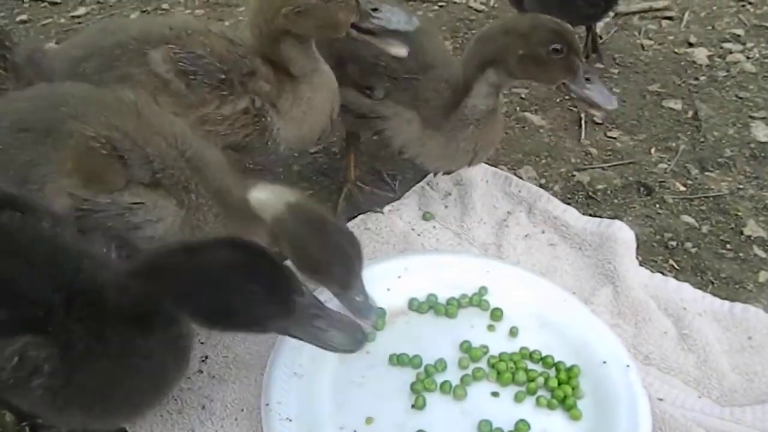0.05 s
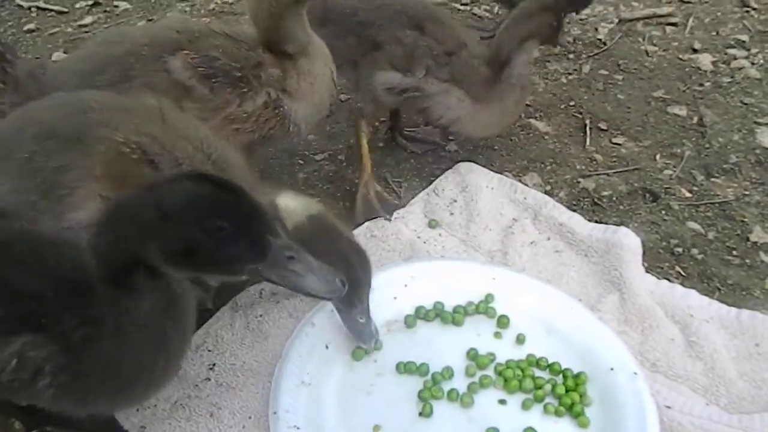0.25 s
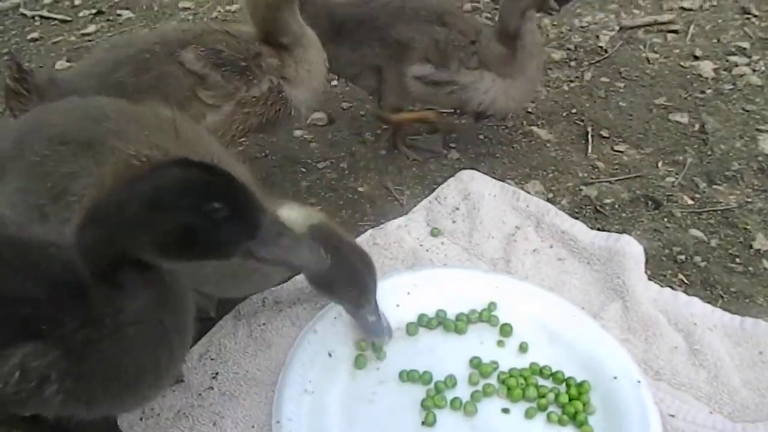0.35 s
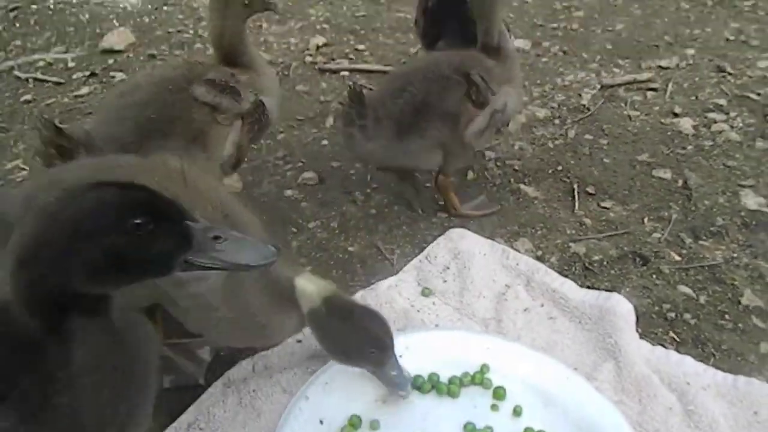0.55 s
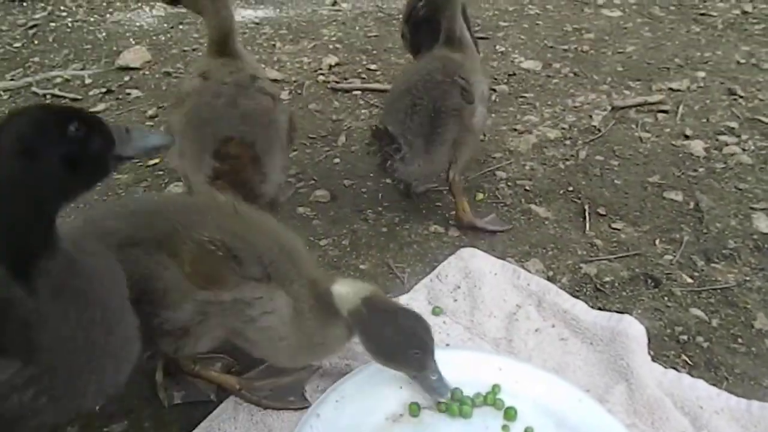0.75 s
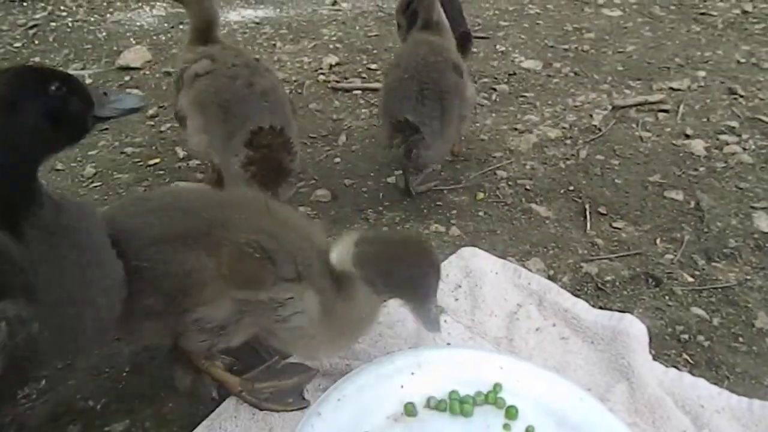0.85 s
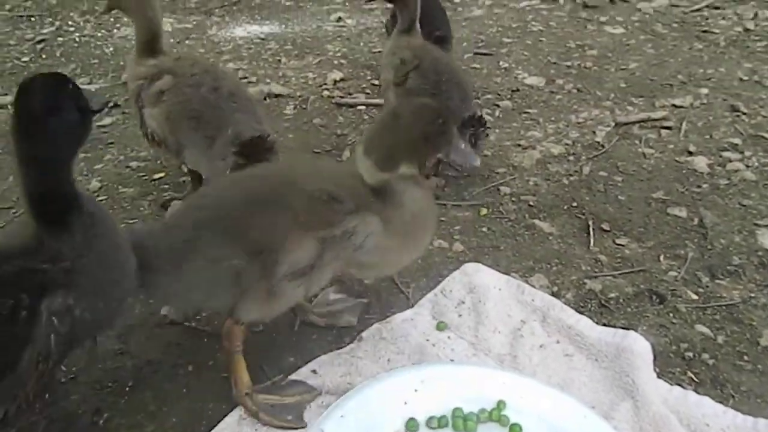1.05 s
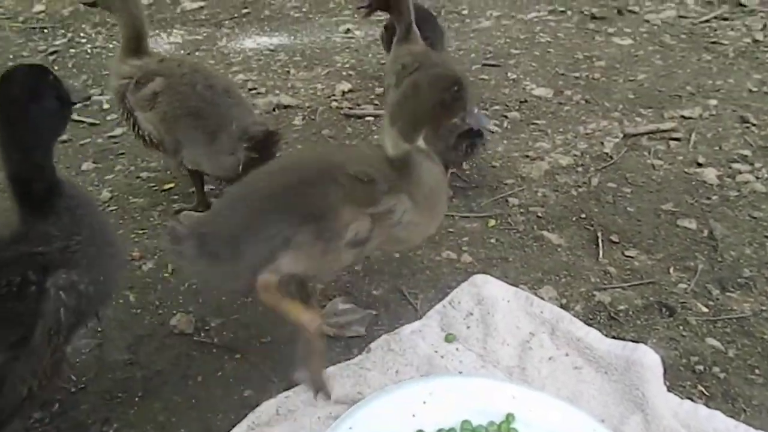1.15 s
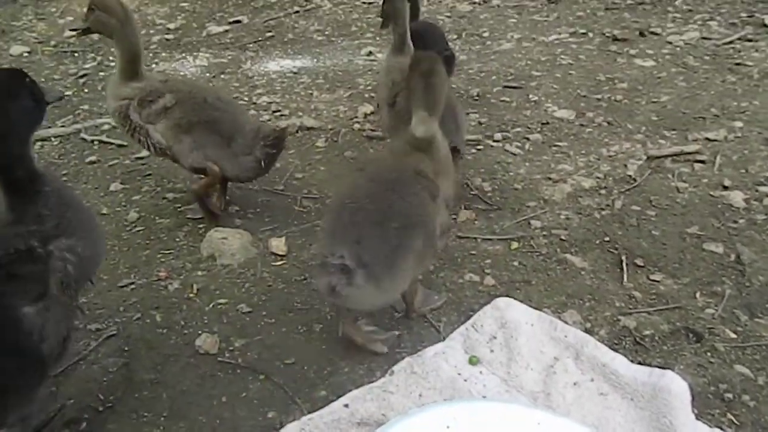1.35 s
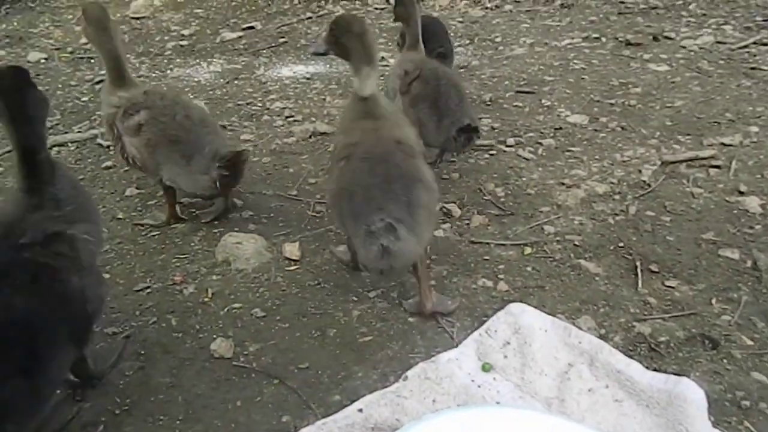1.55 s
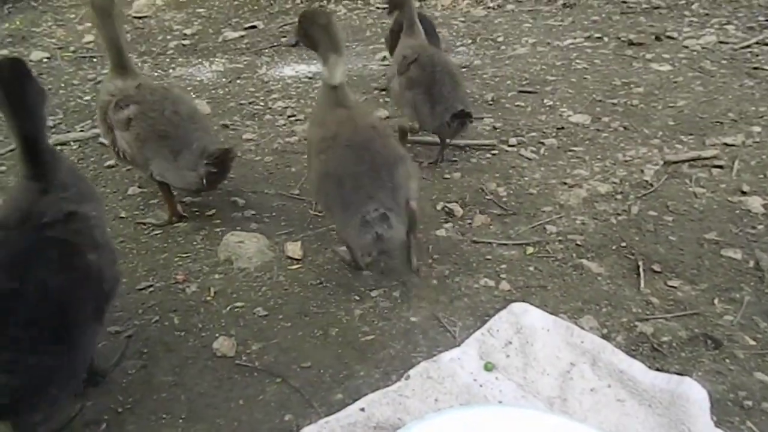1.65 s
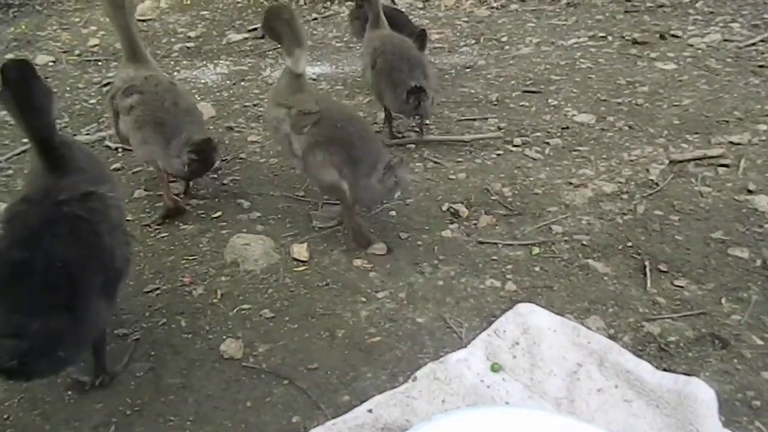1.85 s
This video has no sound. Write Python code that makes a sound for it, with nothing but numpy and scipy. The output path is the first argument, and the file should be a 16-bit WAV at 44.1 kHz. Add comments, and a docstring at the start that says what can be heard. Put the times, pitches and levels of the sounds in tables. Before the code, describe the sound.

Duckling peeps, quick arched whistles, over light bill taps on a plastic plate outdoors

```python
"""Four arched duckling peeps over the pecking of bills on a plastic plate, soft steps on grit and a low hum.
Place: a cloth outdoors, birds and plate close to the stereo microphone, the hum far off.
Peeps are near-sine whistles with an octave, sidebands and breath; pecks are impulses into ringing plate modes.
The hum is shaped noise, a faint steady sine lies in it, and a short noise tail scatters the near sounds."""
import sys
import numpy as np
from scipy import signal
from scipy.fft import rfft, irfft
from scipy.io import wavfile
from scipy.ndimage import uniform_filter1d

SR = 44100
rng = np.random.default_rng(int(sys.argv[2]) if len(sys.argv) > 2 else 0)


def wrap_up_sound(samples):
    """Save the sound to the file named by the first command line argument, as 16-bit audio."""
    columns = np.atleast_2d(samples).T
    # keep every value between -1 and 1, then stretch to whole-number steps
    tamed = np.clip(columns, -1, 1)
    steps = np.round(tamed * 32767).astype(np.int16)
    wavfile.write(sys.argv[1], SR, steps)


N = 83790  # samples

# Distant hum, spectrum before levelling: (frequency [Hz], relative density [dB])
HUM_SPECTRUM = [(24, -41), (40, -14.5), (106, -2.5), (180, -12), (215, -13), (363, -13.5), (444, -18),
                (733, -22.5), (873, -21), (990, -18.5), (16000, -38)]
# Likeness of the hum in the two channels: (frequency [Hz], correlation [-1 to 1])
HUM_LIKENESS = [(60, 0.87), (240, 0.14), (950, 0.13), (3770, 0.13), (15000, -0.31)]
# Stereo balance of the hum: (frequency [Hz], left minus right [dB])
HUM_BALANCE = [(60, 0), (240, -2), (950, -1.5), (3770, -1.5), (15000, 0.5)]
# Modes of the plate before each spot bends them: (frequency [Hz], relative level [dB], 60 dB decay time [s])
PLATE_MODES = [(189.2, -1.5, 0.037), (313.2, -1, 0.018), (458, 0.5, 0.014), (615, 1, 0.014),
               (1045, -2.5, 0.022), (1718, 7.5, 0.0038), (2560, 7.5, 0.0025), (3150, 2, 0.0058),
               (3520, -5.5, 0.0045), (5160, -4.5, 0.0063), (6800, -13.5, 0.0052), (9280, -11, 0.0039),
               (11560, -14.5, 0.0043), (14000, -21, 0.0029)]
# Bill ticks: (time [s], drive of the high modes [dB], treble tilt [dB per octave])
BILL_TICKS = [(0.0794, -25, 3), (.0845, -43, -10), (0.096, -36, -8), (0.1048, -34, 2), (.106, -29, -3.5),
              (.1255, -38, 1), (.139, -46, 5), (0.178, -44, 12), (.197, -40, -6), (0.214, -34.5, -2),
              (.298, -37, 2.5), (.3355, -27, -17), (.361, -11, -11), (.4375, -14.5, -2.5),
              (.4436, -22, 1.5), (0.4466, -22, 1), (.5205, -35, 2), (.532, -25, -28), (.5338, -25, -5),
              (0.5351, -19.5, -11), (0.602, -35.5, -11), (0.9108, -43, 4), (0.9301, -35, 4),
              (1.042, -44.5, 7.5), (1.456, -45, 0), (1.507, -45.5, -12)]
# Soft knocks of bills and feet: (time [s], drive of the low modes [dB], pitch they answer around [Hz])
SOFT_KNOCKS = [(.061, -30, 330), (.07, -25, 515), (0.0996, -30, 190), (.124, -28, 487),
               (0.3346, -32.5, 398), (0.3592, -20, 252), (.361, -17.5, 1020), (.372, -31, 326),
               (.4365, -26, 356), (.519, -40.5, 387), (.537, -26.5, 286), (.9245, -27.5, 290),
               (0.9301, -26, 375), (0.9345, -35, 192), (0.9547, -40, 250), (1.372, -36.5, 350),
               (1.523, -39.5, 330), (1.775, -42.5, 480), (1.815, -37.5, 395)]
# Scrapes: (start [s], length [s], low-mode drive [dB], high-mode drive [dB], treble tilt [dB per octave])
PLATE_SCRAPES = [(0.056, 0.069, -33, -30.5, 2), (0.149, 0.091, -64, -37, 6.5),
                 (0.246, 0.023, -32.5, -34, 2.5), (0.343, 0.031, -31, -51, -18),
                 (0.408, 0.042, -38, -27.5, 2.5), (0.4349, 0.019, -30.5, -15, 5),
                 (0.507, 0.057, -38.5, -33, 5), (0.696, 0.053, -30.5, -24.5, -2),
                 (0, 0.067, -47.5, -46.5, 11.5), (0.583, 0.22, -47, -42.5, 3)]
# Stereo phase of the plate: (frequency [Hz], left ahead of right [rad])
PLATE_LEAD = [(2000, 0.12), (16000, 1.53)]
# Stereo balance of the plate: (frequency [Hz], left minus right [dB])
PLATE_BALANCE = [(60, 18), (240, -2), (950, -1.5), (3770, -4), (15000, 2)]
# Pitch and level through each peep, one curve per peep: (time [s], pitch [Hz], level [dB])
PEEP_CURVES = [
    [(.222, 1620, -50), (.23, 1800, -34), (.24, 2210, -21), (.25, 2500, -17.5), (.257, 2600, -20.5),
     (.2615, 2640, -35), (.265, 2645, -27), (.274, 2350, -29), (.284, 1940, -35), (.297, 1520, -54)],
    [(.336, 1830, -46), (.343, 2060, -28), (.352, 2285, -21.5), (.36, 2385, -20), (.37, 2445, -21),
     (.379, 2455, -19.5), (.388, 2290, -23), (.397, 1910, -35), (.406, 1650, -52)],
    [(.701, 1650, -48), (.708, 2110, -28), (.716, 2470, -19), (.722, 2745, -21), (.73, 2960, -27.5),
     (.737, 3060, -30.5), (.746, 2830, -26), (.753, 2470, -20.5), (.758, 2030, -33), (.764, 1600, -50)],
    [(1.566, 1600, -48), (1.5675, 1670, -34), (1.572, 1830, -36), (1.577, 1980, -30), (1.585, 2110, -33),
     (1.594, 2135, -34), (1.61, 1930, -30.5), (1.618, 1800, -39), (1.633, 1560, -58)],
]
# Colour of each peep, first two against its peak, sidebands on the tone's own scale:
# (octave [dB], breath [dB], sideband [dB], left minus right [dB])
PEEP_VOICES = [(-42, -27, -45, -5), (-33, -32, -45, -4.5), (-34, -24, -38, -4.5), (-30, -24, -9, -3.5)]
# Breath spectrum before levelling: (frequency [Hz], relative level [dB])
BREATH_SPECTRUM = [(100, -15), (700, -12.5), (1800, -8.5), (3200, -17), (5500, -15), (8000, -27),
                   (16000, -41)]

HUM_DB = -47  # rms over both channels, before the bass cut and band limit
WHINE_HZ, WHINE_DB = 1117, -67.5  # peak level before it wavers
YARD_T60, YARD_PEEP_DB, YARD_PLATE_DB = 0.098, -18, -7  # decay [s], sends into the scatter [dB]
SPOTS = 5  # places on the plate that share scrapes and grit
RASP_PER_S, GRIT_PER_S = 2800, 130  # blows per second over all spots
GRIT_DB = -62.5  # drive of the high modes
FOCUS_DB = 9.5  # fall of a mode one octave from the pitch of a knock
MUTE_DB = -99  # drive of modes left silent
WHISTLE_LEAD = 0.24  # left ahead of right [rad]
WARBLE = 1 / 4  # an uneven four-cycle beat of the membrane puts lines a quarter of the pitch apart
LOWER_DB, TENTH_DB = -4, -17  # lower line and octave of the upper line, against the upper line
LOW_CUT_HZ, EDGE_HZ = 51, 15850
SIDES = np.array([[.5], [-.5]])  # left and right halves of a stereo difference


def amp(db):
    """Amplitude factor of a level in dB."""
    return 10 ** (np.asarray(db) / 20)


def evened(x):
    """Scale a signal to an rms of one."""
    return x / np.sqrt(np.mean(x ** 2) + 1e-20)


def read(points, hz):
    """Read a curve at any frequency, straight between its points on a log axis."""
    f, value = np.transpose(points)
    return np.interp(np.log(hz + 1), np.log(f + 1), value)


def add(mix, s, sound):
    """Lay a sound into the mix at s seconds, cut off at the end of the mix."""
    part = mix[..., round(s * SR):][..., :sound.shape[-1]]
    part += sound[..., :part.shape[-1]]


def hum():
    """Distant outdoor wash: partly shared stereo noise, shaped by band, with drifting patches of level."""
    frames, hz = N // 256 + 5, np.fft.rfftfreq(1024, 1 / SR)
    a, b, c, d, patches = rng.standard_normal((frames, 513, 5)).T
    patches = uniform_filter1d(patches, 30, 0)  # over frequency
    patches = evened(uniform_filter1d(patches, 6, 1))  # over time
    same = np.clip(read(HUM_LIKENESS, hz), -1, 1)[:, None]
    left = a + 1j * b
    right = same * left + np.sqrt(1 - same ** 2) * (c + 1j * d)
    z = np.array([left, right])
    z *= amp(read(HUM_SPECTRUM, hz)[:, None] + 1.25 * patches)
    z *= amp(SIDES[:, :, None] * read(HUM_BALANCE, hz)[:, None])
    wash = signal.istft(z, nperseg=1024, noverlap=768)[1][:, :N]
    return amp(HUM_DB) * evened(wash)


def whine():
    """A faint sine of steady pitch that wavers a little in level."""
    waver = evened(uniform_filter1d(rng.standard_normal(N), size=4000))
    return amp(WHINE_DB + 2 * waver) * np.sin(2 * np.pi * WHINE_HZ * np.arange(N) / SR)


def yard(x):
    """Short scatter from the ground and the other birds: a decaying noise tail for each channel."""
    t = np.arange(round(.25 * SR)) / SR
    tail = rng.standard_normal((2, len(t))) * amp(-60 * t / YARD_T60) * (t > .002)
    return signal.fftconvolve(x, tail / np.linalg.norm(tail[0]), axes=1)[:, :N]


def blows(count, per_s):
    """Random clicks of either sign, a few of them large."""
    u, size, sign = rng.random((count, 3)).T
    return (u < per_s / SR) * amp(-3.5 * np.log(size + 1 / 100)) * np.sign(sign - .5)


def ring(hits, thud_db, click_db, tilt_db, knock_hz=None):
    """The plate's modes answer a train of blows; each spot that is hit bends their pitch and weight."""
    t, out = np.arange(2000) / SR, 0
    spot = rng.standard_normal((len(PLATE_MODES), 2))
    for (hz, db, t60), (bend, weight) in zip(PLATE_MODES, spot):
        click = click_db + tilt_db * np.log2(max(hz / 3200, 1))
        db = db + (thud_db if hz < 1350 else click) + weight
        db = db - FOCUS_DB * np.log2(hz / (knock_hz or hz)) ** 2
        hz = hz * (1 + .07 * bend)
        onset = np.minimum(t * hz / .5, 1) ** 2  # rises over half a cycle
        mode = onset * amp(db - 60 * t / t60) * np.sin(2 * np.pi * hz * t)
        out = mode - out  # neighbours swing against each other
    return signal.fftconvolve(hits, out)


def ticks(out):
    """Bill ticks: one blow within a 2 ms swell of faint random grains, answered by the high modes."""
    for s, db, tilt_db in BILL_TICKS:
        grains = 0.17 * rng.standard_normal(90) * np.hanning(90) * (rng.random(90) < .1)
        blow = np.arange(90) == 44  # 1 ms in
        add(out, s - .001, ring(grains + blow, MUTE_DB, db, tilt_db))


def knocks(out):
    """Soft knocks of bills and feet: single blows that rouse the low modes near one pitch."""
    for s, db, hz in SOFT_KNOCKS:
        add(out, s, ring(np.ones(1), db, MUTE_DB, 0, hz))


def scrapes(out):
    """Scrapes at one spot: dense runs of small blows that swell and fade with the stroke."""
    for s, length, *strength in PLATE_SCRAPES:
        n = round(length * SR)
        stroke = np.sin(np.pi * np.linspace(0, 1, n) ** .7) ** 1.2
        add(out, s, ring(stroke / 10 * blows(n, RASP_PER_S / SPOTS), *strength))


def grit():
    """Grit under many feet: sparse faint blows all through, rung by the same modes."""
    return ring(blows(N, GRIT_PER_S / SPOTS), GRIT_DB - 5, GRIT_DB, -0.63)[:N]


def pecking():
    """All the blows near the microphone, spread to stereo by a level and phase difference per frequency."""
    out = np.zeros(N)
    ticks(out)
    knocks(out)
    for _ in range(SPOTS):
        scrapes(out)
        out += grit()
    hz = np.fft.rfftfreq(N, 1 / SR)
    balance = amp(SIDES * read(PLATE_BALANCE, hz))
    lead = np.exp(1j * SIDES * read(PLATE_LEAD, hz))
    return irfft(rfft(out) * balance * lead, N)


def peep(curve, octave_db, breath_db, side_db, lean_db):
    """A near-sine whistle with a faint octave, flickering sidebands, and breath."""
    s, hz, db = np.transpose(curve)
    t = np.arange(s[0], s[-1], 1 / SR)
    hz = uniform_filter1d(np.interp(t, s, hz), size=200)
    db = uniform_filter1d(np.interp(t, s, db), size=60)
    edge = np.clip(np.minimum(t - t[0], t[-1] - t) / .002, 0, 1)
    arch = ((hz - hz.min()) / np.ptp(hz)) ** 1.5  # 0 at the lowest pitch, 1 at the highest
    shiver = 1 + .06 * evened(uniform_filter1d(rng.standard_normal(len(t)), size=40))

    turn = 2 * np.pi * np.cumsum(hz) / SR + SIDES * WHISTLE_LEAD  # phase [rad]
    beat = WARBLE * turn
    upper = arch ** 0.84 * np.sin(turn + beat)
    lower = amp(LOWER_DB) * (1 - arch) * np.sin(turn - beat)
    tenth = amp(TENTH_DB) * arch ** 2 * np.sin(2 * (turn + beat))
    tone = np.sin(turn) + amp(side_db) * shiver ** 3 * (upper + lower + tenth)
    octave = amp(octave_db + db.max()) * arch ** 2 * np.sin(2 * turn) * shiver ** 8

    colour = amp(read(BREATH_SPECTRUM, np.fft.rfftfreq(len(t), 1 / SR)))
    air = evened(irfft(rfft(rng.standard_normal(len(t))) * colour, len(t)))
    breath = amp(breath_db + db.max()) * arch * shiver ** 3 * air
    sound = np.sqrt(2) * (amp(db) * tone * shiver + octave) + breath  # root 2: sine levels are rms
    return t[0], edge * sound * amp(SIDES * lean_db)


def scene():
    """Peeps and plate close by, their scatter around them, hum and whine behind."""
    voices, plate = np.zeros((2, N)), pecking()
    for curve, voice in zip(PEEP_CURVES, PEEP_VOICES):
        add(voices, *peep(curve, *voice))
    scatter = yard(amp(YARD_PEEP_DB) * voices + amp(YARD_PLATE_DB) * plate)
    return voices + plate + scatter + hum() + whine()


def record(dry):
    """The microphone's bass cut, then the band limit."""
    bass_cut = signal.butter(4, LOW_CUT_HZ, "high", fs=SR, output="sos")
    band_limit = signal.firwin(511, EDGE_HZ, window=("kaiser", 9), fs=SR)
    return signal.oaconvolve(signal.sosfilt(bass_cut, dry), band_limit[None], "same")


dry = scene()
out = record(dry)
wrap_up_sound(out)
```